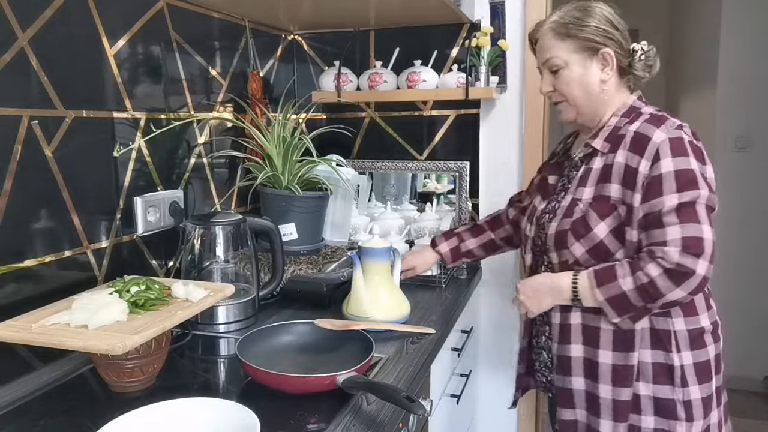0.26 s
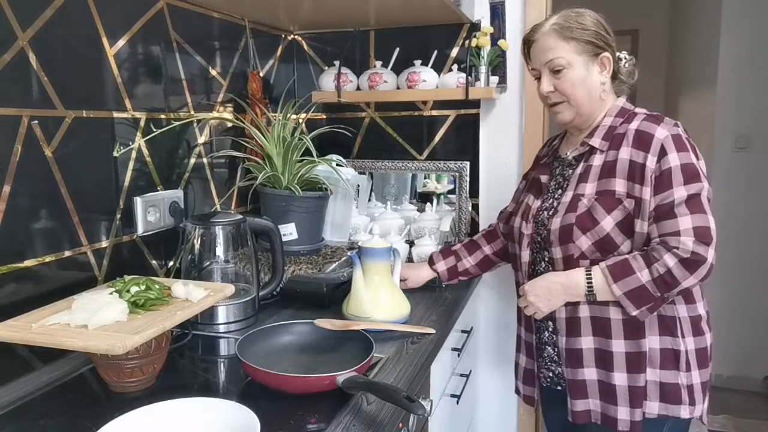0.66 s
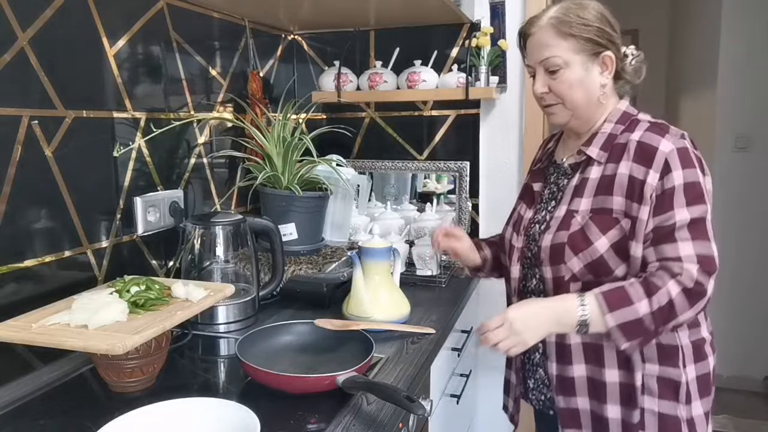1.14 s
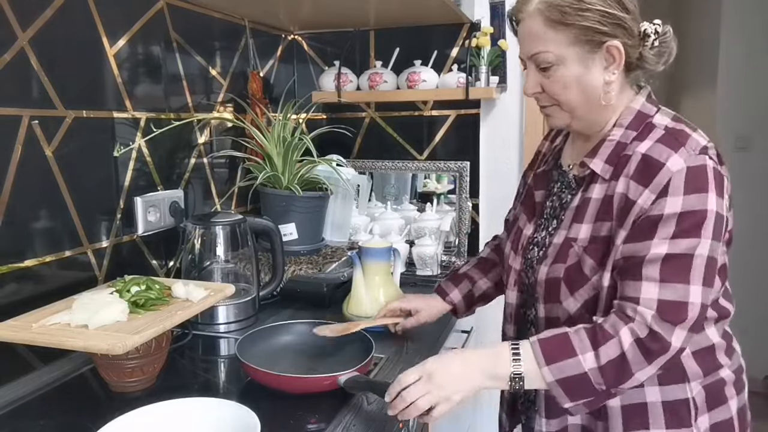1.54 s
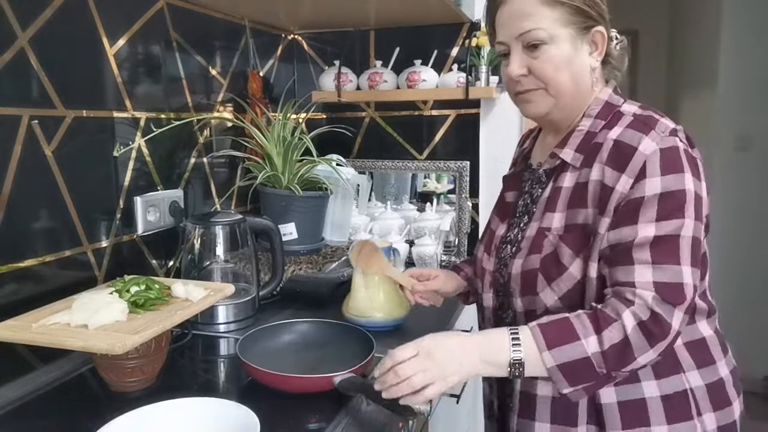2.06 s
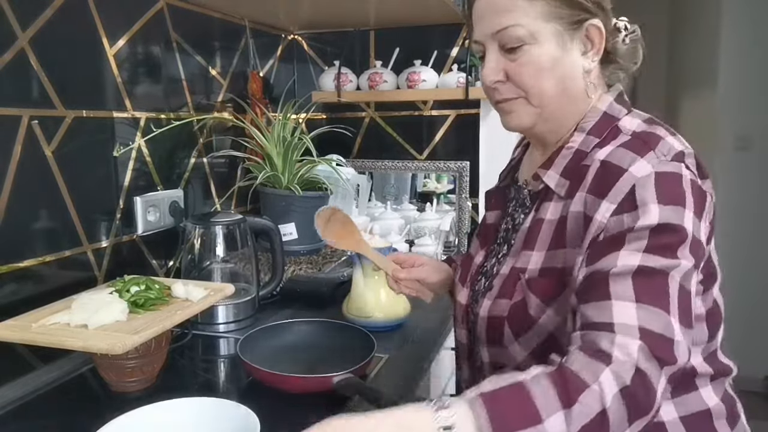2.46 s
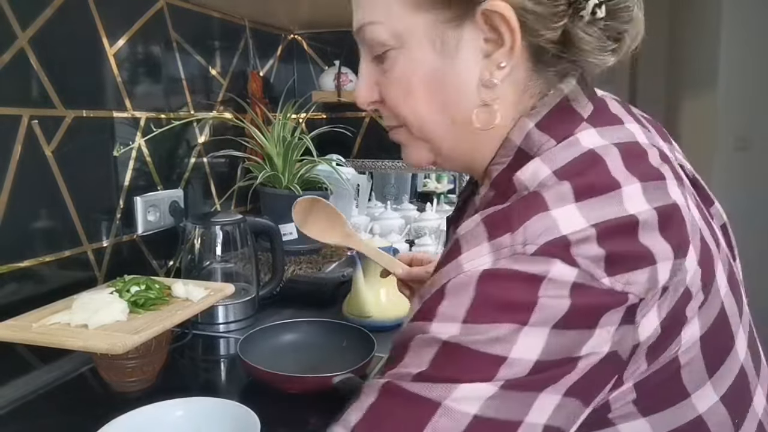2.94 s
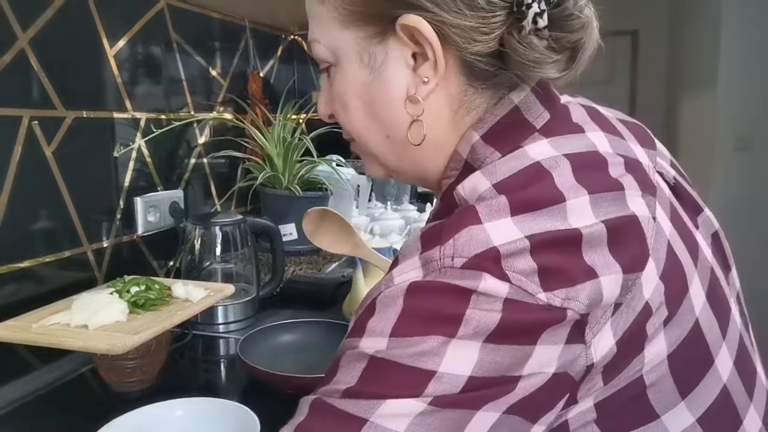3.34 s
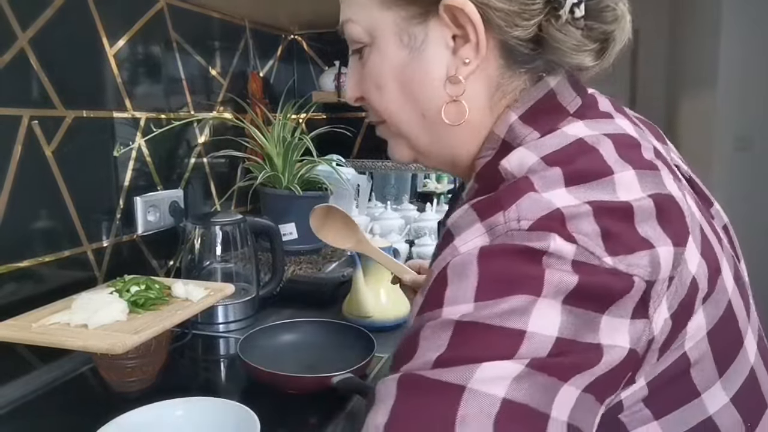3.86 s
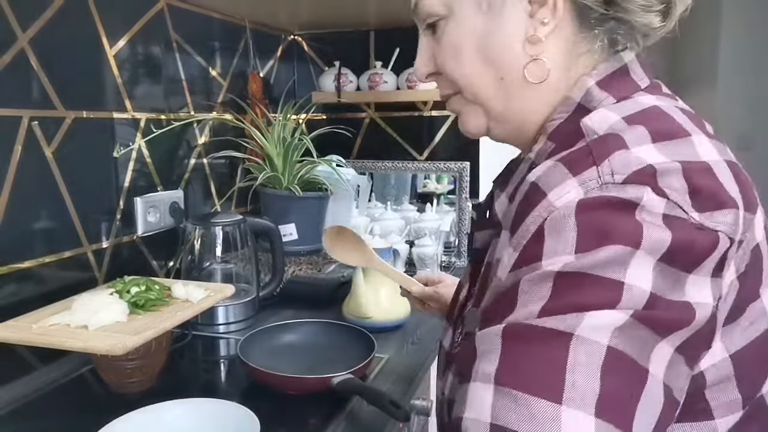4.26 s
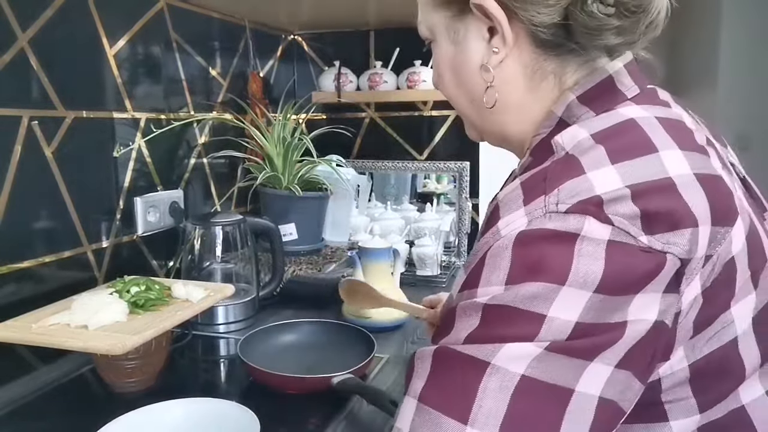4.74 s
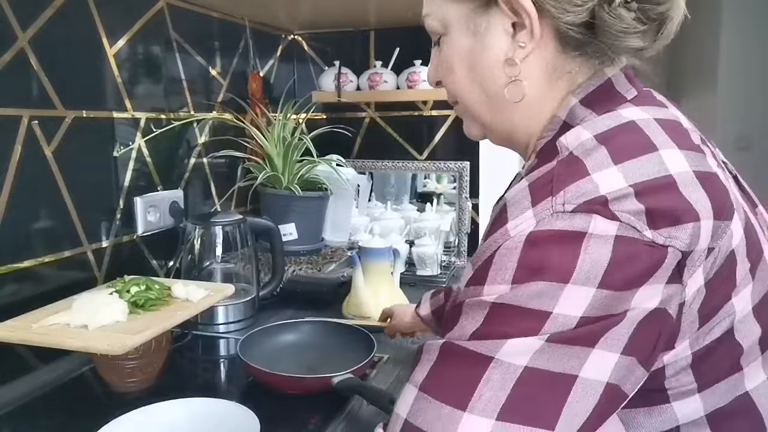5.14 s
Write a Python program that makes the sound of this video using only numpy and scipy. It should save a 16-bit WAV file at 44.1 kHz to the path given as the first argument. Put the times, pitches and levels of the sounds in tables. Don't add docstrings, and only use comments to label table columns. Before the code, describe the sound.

In a still, tiled kitchen, small knocks and soft steps lead to a short pan scrape and a sudden heavy bang with rattling grate.

```python
import sys
import numpy as np
from scipy import signal
from scipy.fft import rfft, irfft, next_fast_len
from scipy.io import wavfile
from scipy.ndimage import map_coordinates

SR = 44100
rng = np.random.default_rng(int(sys.argv[2]) if len(sys.argv) > 2 else 0)


def boost(x):
    u = np.asarray(x, float) / 20
    return 10 ** u


def output_pcm(signal):
    pcm = np.clip(np.atleast_2d(signal).T, -1, 1) * 32767
    wavfile.write(sys.argv[1], SR, np.round(pcm).astype(np.int16))


N = 237478


def unit(x):
    return x / np.sqrt(np.mean(x ** 2) + 1e-20)


def along(points, hz):
    f, value = np.transpose(points)
    return np.interp(np.log(hz + 1), np.log(f + 1), value)


def shape(points):
    return lambda hz: boost(along(points, hz))


def sides(db):
    return boost(np.array([db / 2, -db / 2]))


def wobble(rate, size=N):
    knots = rng.standard_normal(int(size * rate / SR) + 4)
    return map_coordinates(knots, [np.arange(size) * rate / SR])


def filtered(x, response):
    m = next_fast_len(x.shape[-1] + 8192, real=True)
    return irfft(rfft(x, m) * response(np.fft.rfftfreq(m, 1 / SR)), m)[..., :x.shape[-1]]


def resonances(peaks, widen):
    def response(f):
        total = 0
        for k, (centre, width, db) in enumerate(peaks):
            damping = 1j * f * width * widen
            total = total + (-1) ** k * boost(db) * damping / (centre * centre - f * f + damping)
        return total
    return response


def rush(gain, alike, size=N):
    turn = lambda hz: np.arccos(np.clip(along(alike, hz), -1, 1)) / 2
    split = lambda hz: gain(hz) * np.array([np.cos(turn(hz)), np.sin(turn(hz))])
    mid, side = filtered(rng.standard_normal((2, size)), split)
    return unit(np.array([mid + side, mid - side]))


def add(track, s, sound):
    part = track[:, round(s * SR):][:, :sound.shape[1]]
    part += sound[:, :part.shape[1]]


def level(rows):
    s, db = np.transpose(rows)
    t = np.arange(N) / SR
    return np.interp(t, s, db, -140, -140), np.clip(t - s[0], 0, s[-1] - s[0])


def swells(s, db, rise, fade):
    rounding = 0.1289
    coarse = np.arange(0, N / SR + .002, .002)
    t = coarse - s[:, None]
    away = np.hypot(np.maximum(-t / rise[:, None], t / fade[:, None]), rounding) - rounding
    power = boost(2 * (db[:, None] - 20 * away)).sum(axis=0)
    return np.interp(np.arange(N) / SR, coarse, 10 * np.log10(power + 1e-14))


# f/Hz, likeness [1 = same]
NEAR_LIKENESS = [(60, 0.9418), (300, 0.8526), (700, 0.7493), (2000, 0.095), (10000, 0.023)]


def burst(body, t60, size, rise=0.0005426):
    t = np.arange(size) / SR
    return (1 - np.exp(-(t / rise) ** 2)) * boost(-60 * t / t60) * rush(body, NEAR_LIKENESS, size=size)


def strike(body, t60, rise=0.0002456):
    ring = filtered(burst(np.ones_like, t60, size=12000, rise=rise), body)
    return ring / np.abs(ring).max()


# f/Hz, level/dB per Hz
FINE_GRIT = [(3500, -120), (4300, -1), (6000, -0.5), (9000, -2), (13000, -7.5), (14800, -20),
             (15900, -31.5)]


def friction(level_db, bright_db, pan_db, body, grain_db, grit=FINE_GRIT):
    out, touching = np.zeros((2, N)), np.flatnonzero(level_db > -139)
    span = slice(touching[0], touching[-1] + 1)
    size = span.stop - span.start
    grip = unit(boost(grain_db * wobble(90, size=size) + grain_db * wobble(400, size=size)))
    rub = rush(body, NEAR_LIKENESS, size=size)
    rub = rub + boost(bright_db[span]) * rush(shape(grit), NEAR_LIKENESS, size=size)
    out[:, span] = sides(pan_db[span]) * grip * boost(level_db[span]) * rub
    return out


def sing(hz, size, swing_db, rate, drift):
    phase = 2 * np.pi * hz * np.arange(size) / SR + drift * wobble(129.96, size=size)
    return boost(swing_db * wobble(rate, size=size)) * np.sin(phase)


# f/Hz, width/Hz, level/dB
FRIDGE_HUM = [(100.17, 7.447, 1.5), (192.54, 7.953, -2.5), (289.45, 33.71, -9), (356.54, 9.45, -3.5),
              (740.07, 3.705, -10)]
# f/Hz, level/dB per Hz
ROOM_RUMBLE = [(35, -14), (60, -3), (140, -10.5), (360, -14), (470, -14), (930, -20.5), (4000, -33.5),
               (5200, -66.5)]
# f/Hz, level/dB per Hz
FLOOR_DRONE = [(45, -11), (70, 5), (110, 9), (150, -5.5), (230, 4), (380, -5.5), (600, -37.5)]
# t/s of the peak, level/dB, rise by 20 dB/s, fade by 20 dB/s
SHAKES = [
    (1.92, -52, 0.3562, 0.8356),
    (3.74, -41.5, 0.2096, 0.22),
    (5.08, -35, 0.0471, 0.272),
    (5.25, -47, 0.1924, -0.0129),
    (5.38, -39.5, 0.0487, 1),
]
# f/Hz, level/dB per Hz
MIC_HISS = [(2060, -37.5), (3500, -14), (3820, -2), (4650, -7.5), (7360, -8), (8040, -11), (15000, -5),
            (15800, -9)]
# f/Hz, likeness [1 = same]
ROOM_LIKENESS = [(60, 0.094), (150, 0.415), (380, 0.7136), (950, -0.3171), (2380, 0.0427), (5980, -0.2392),
                 (15000, 0.0244)]
# f/Hz, likeness [1 = same]
ECHO_LIKENESS = [(60, 0.9391), (250, 0.9505), (700, 0.041), (2000, .05)]


def room_tone():
    mains = np.sin(2 * np.pi * 50.102 * np.arange(N) / SR + .5 * wobble(11))
    mains = boost(-55.0 + 2.2 * wobble(13.0)) * mains
    hum = boost(-65.5) * rush(resonances(FRIDGE_HUM, widen=0.5885), ROOM_LIKENESS)
    rumble = boost(-66.5 + 0.7693 * wobble(3.3949)) * rush(shape(ROOM_RUMBLE), ROOM_LIKENESS)
    stirred = boost(-66) + boost(swells(*np.transpose(SHAKES)))
    drone = stirred * boost(4.2334 * wobble(21.874) - 4.0) * rush(shape(FLOOR_DRONE), ECHO_LIKENESS)
    hiss = boost(-78.0) * rush(shape(MIC_HISS), ROOM_LIKENESS)
    return rumble + drone + hum + mains + hiss


# t/s, level/dB at the peak, f/Hz,
# t60/s
TAPS = [(0.424, -57, 2497, 0.1214), (0.428, -64, 1888, 0.1023), (0.424, -59, 1432, 0.0487),
        (0.979, -58.5, 5417, 0.098), (0.799, -61, 2100, 0.2155), (0.829, -59.5, 891.4, 0.1839),
        (0.868, -58.5, 1893, 0.0919), (0.978, -37, 1994, 0.0463), (0.985, -38, 2022, 0.0752),
        (1.001, -45.5, 1816, 0.0806), (1.171, -41.5, 1605, 0.02533), (1.174, -50, 752.7, 0.0429),
        (1.478, -64, 1030, 0.1466), (1.763, -43.5, 611.9, 0.1331), (1.793, -46, 600.6, 0.05565),
        (1.948, -51, 703.7, 0.139), (1.949, -54, 1501, 0.0866), (1.95, -58, 2403, 0.0842),
        (2.009, -46, 743.3, 0.05097), (2.318, -54.5, 2690, 0.122), (2.648, -59, 2045, 0.0698),
        (2.964, -66, 2600, 0.078), (4.809, -60.5, 890, 0.2909), (2.83, -63.5, 892.3, 0.1355),
        (4.84, -60.5, 1837, 0.1342)]


def taps():
    out = np.zeros((2, N))
    for s, db, hz, t60 in TAPS:
        mode = resonances([(hz, 316.1, 0)], widen=0.8262)
        add(out, s, boost(db) * strike(lambda f: mode(f) ** 2 + 0.2938 * mode(f), t60))
    return out


# t/s of the peak, rub level/dB, fade by 20 dB/s, brightness/dB, shuffle/dB
SCUFFS = [(0.48, -72, 0.12, -11, -0.5), (0.83, -70, 0.3, -5.5, -0.5), (0.93, -76, 0.7, -6, -1),
          (1.1, -57.5, 0.11, -10, 1.5), (1.177, -58, 0.0863, -14, 8.5), (1.255, -65.5, 0.14, -1, -10),
          (1.483, -68, 0.03, 0, -9.5), (1.51, -68, 0.12, -1, -9.5), (1.66, -70, .12, -2, -5),
          (1.73, -61, 0.035, 2.5, -2.5), (1.76, -60, .09, 1, -3), (1.797, -58, 0.14, -3.5, -1.5),
          (1.96, -66.5, 0.01, -26, 11.5), (2.012, -57.5, 0.1, -4.5, -1), (2.07, -65, .1, -5, 4),
          (2.13, -61, 0.13, -8, -12), (2.322, -60.5, 0.11, -5.5, -13), (2.59, -72, 0.1, 0, -8),
          (2.645, -70, 0.13, -4, -5), (2.83, -71, 0.2, -5, 3), (2.99, -71.5, 0.23, -9, -7),
          (3.11, -77, .1, 1, -13), (3.174, -73, 0.54, -4, -18), (3.54, -67, .2, -14, 6),
          (4.82, -70, 0.09, -9, -6), (4.885, -71, 0.13, -12, -8)]
# f/Hz, level/dB per Hz
CLOTH_RUB = [(900, -37.5), (1400, -2.5), (2200, -1.5), (3500, -5), (5000, -10), (6500, -42.5)]
# f/Hz, level/dB per Hz
LOW_SHUFFLE = [(200, -7.5), (400, 0.5), (800, -4), (1300, -4), (1900, -37)]


def scuffs():
    s, db, fade, bright_db, low_db = np.transpose(SCUFFS)
    rise = 0.61945 * fade
    rub, grit, shuffle = (swells(s, db + more, rise, fade) for more in (0, bright_db, low_db))
    low = boost(shuffle + 0.803 * wobble(64)) * rush(shape(LOW_SHUFFLE), NEAR_LIKENESS)
    pan_db = 1.5 * wobble(5.707)
    return low + friction(rub, grit - rub, pan_db, shape(CLOTH_RUB), grain_db=0.8213)


# t/s, level/dB at the peak, brightness/dB, left-right/dB
CLACKS = [(0.978, -35.5, -28, 4.5), (0.986, -33, -26.5, 1), (1.001, -37.5, -13, 4),
          (1.0205, -23, -18.5, 3.5), (1.028, -23.5, -19, -0.5), (1.041, -30, -14.5, -1),
          (1.056, -26, -13, -5), (1.065, -28, -22.5, 7), (1.078, -28, -29.5, 5.5), (1.097, -37, -19, -3.5),
          (1.113, -41, -27.5, 2), (1.124, -47, -30, 5.5), (1.14, -44, -29, 0), (1.166, -37.5, -19, 2.5),
          (1.175, -50, -25, 2.5), (1.19, -57, -24.5, -1.5)]
# f/Hz, width/Hz, level/dB
LID = [(638.04, 46.71, -5.5), (942.7, 45.25, -1.5), (1345.6, 26.73, 1), (1782.5, 56.06, 4),
       (2100, 45.92, 3.5), (2460, 16.02, -25), (2644.8, 86.6, -10), (4066.2, 230.4, -17)]
# f/Hz, level/dB per Hz
LID_BODY = [(120, -48.5), (272, -12.5), (427, -2), (683, -28.5), (1850, -13), (2420, -25), (10100, -5),
            (15000, -35.5)]


def clacks():
    out, ring = np.zeros((2, N)), resonances(LID, widen=6.583)
    body = lambda f: ring(f) + 0.0512 * shape(LID_BODY)(f)
    for s, db, bright_db, pan_db in CLACKS:
        knock = strike(body, t60=0.03406, rise=0.0003384)
        hiss = boost(bright_db - 7) * burst(shape(FINE_GRIT), t60=0.08985, size=12000)
        add(out, s, boost(db - 0.5) * sides(pan_db)[:, None] * (knock + hiss))
    return out


# t/s,
# level/dB at the peak, f/Hz, t60/s, rise/s
THUMPS = [(1.058, -52.5, 287, 0.2202, 0.01598), (1.12, -51, 101.2, 0.6364, 0.02234),
          (1.162, -50, 300, 0.1435, 0.00967), (1.3, -41.5, 56.52, 0.2777, 0.00795),
          (1.247, -55.5, 65.84, 0.335, 0.019), (1.349, -53, 62.4, 0.1, 0.015),
          (1.639, -60, 267, 0.1285, 0.01198), (1.694, -47, 103.74, 0.1762, 0.01145),
          (1.76, -49, 170.01, 0.1078, 0.0077), (1.782, -42, 253.37, 0.1054, 0.01161),
          (1.961, -46.5, 217, 0.1114, 0.0093), (2.029, -37, 95.65, 0.1265, 0.00798),
          (2.06, -44, 101.7, 0.1965, 0.0467), (2.469, -55, 197, 0.1548, 0.0144),
          (3.524, -51, 110.9, 0.1447, 0.01696), (3.637, -27, 98, 0.10424, 0.01473),
          (3.66, -36, 91, 0.0882, 0.00986), (3.68, -42.5, 99.76, 0.1614, 0.01067),
          (3.775, -37, 106.2, 0.2268, 0.0094), (3.85, -44, 120.72, 0.2029, 0.02447),
          (5.3, -33, 270, 0.2029, 0.01973), (5.285, -30, 119, 0.494, 0.0437),
          (5.225, -39.5, 225, 0.4495, 0.03196), (5.135, -26.5, 112.61, 0.1774, 0.00975),
          (5.019, -19.5, 92, 0.2598, .004), (5.02, -22, 68, .55, .006), (5.018, -20, 121, .16, 0.003804),
          (5.085, -23.5, 119, 0.3179, 0.0165), (5.098, -26, 272, 0.08017, 0.00901),
          (5.345, -28, 93, .3, .006), (5.2, -34, 118, 0.371, .02), (5.348, -20, 263.66, 0.0921, 0.004515),
          (1.22, -53.5, 186.53, 0.136, 0.0172), (2.05, -52, 220, 0.2096, 0.0186),
          (3.8, -47, 61.08, 0.2784, 0.024), (3.05, -61, 106.4, 0.8146, 0.055),
          (1.66, -55, 183, 0.2013, 0.02024)]


def thumps():
    out, t = np.zeros((2, N)), np.arange(SR // 3) / SR
    for s, db, hz, t60, rise in THUMPS:
        swell = (1 - np.exp(-t / rise)) * boost(-60 * t / t60)
        mode = resonances([(hz, 0.2747 * hz, 0)], widen=1.0)
        smear = rush(lambda f: mode(f) ** 2, NEAR_LIKENESS, size=len(t))
        thump = swell / swell.max() * (np.sin(2 * np.pi * hz * t) + 0.4559 * smear)
        add(out, s, boost(db) * sides(1.5)[:, None] * thump)
    return out


# t/s, level/dB
SLIDE = [
    (3.228, -91),
    (3.258, -60.5),
    (3.298, -53),
    (3.356, -61.5),
    (3.42, -59.5),
    (3.461, -66),
    (3.5, -78),
]
# f/Hz, level/dB rms, change/dB per s
STEEL = [(2234, -82, 20), (2936, -76, 40), (3708, -66, 0), (4094, -73, -30), (4568, -69, -10),
         (5498, -62, -90), (7106, -74, 0), (7568, -66, -60), (8238, -68, -90), (8716, -76, 20),
         (9466, -70, -100), (9915, -72, -70), (11205, -73, -30), (12550, -75, -30)]
# f/Hz, level/dB per Hz
SHIMMER = [(3450, -39.5), (3750, 0.5), (4700, 5.5), (5000, -9.5), (6500, 2), (8500, -4.5), (12500, -3.5),
           (15700, -10)]


def slide():
    out, start, size = np.zeros((2, N)), round(SLIDE[0][0] * SR), SR // 2
    level_db, since = (curve[start:start + size] for curve in level(SLIDE))
    pan_db = 14 - 25.5 * since
    modes = np.zeros(size)
    for hz, db, tires_db in STEEL:
        tone = sing(hz, size, swing_db=4.0, rate=43.715, drift=0.5216)
        modes += boost(db + tires_db * np.maximum(since - .08, 0)) * tone
    spacing_hz = 70
    packed_db = 4.5 * rng.standard_normal(SR // spacing_hz)
    uneven = lambda hz: boost(np.interp(hz / spacing_hz, np.arange(len(packed_db)), packed_db))
    shimmer = rush(lambda hz: shape(SHIMMER)(hz) * uneven(hz), NEAR_LIKENESS, size=size)
    shimmer = boost(-6 + 2.253 * wobble(120.27, size=size)) * shimmer
    add(out, SLIDE[0][0], boost(level_db) * sides(pan_db) * (boost(58.5) * modes + shimmer))
    return out


DRAG_PAN_DB = 5.5
# t/s, rub level/dB
DRAG = [
    (3.47, -76),
    (3.572, -63.5),
    (3.608, -49.5),
    (3.616, -36),
    (3.69, -40.5),
    (3.792, -44),
    (3.876, -70.5),
    (4.006, -77),
    (4.05, -81),
]
# f/Hz, width/Hz, level/dB
PAN = [(789.1, 128.98, 6.5), (1539.7, 138.16, 0.5), (1953.7, 391.5, -10), (3120.6, 63.74, -4),
       (3504.9, 36.53, -9.5), (4230.2, 34.15, -15), (5234, 100, -19.5), (6660, 140, -14)]
# t/s, level/dB at the peak, left-right/dB
CATCHES = [(3.613, -46, -12), (3.631, -27, -1), (3.662, -40, -5), (3.679, -39, 6), (3.775, -29, 8),
           (3.781, -25, 0.5), (3.786, -21.5, 6.5), (3.801, -28.5, 4.5), (3.819, -28, 7), (3.838, -31.5, 2),
           (3.855, -39, -4.5), (3.873, -50, 0)]
# f/Hz, width/Hz, level/dB
CATCH = [(659.37, 62.72, -4), (771.04, 84.19, 4.5), (917.9, 91.29, -2), (1556.3, 152.5, -8.5),
         (2217.9, 86.2, -12), (2600, 57.3, -27.5), (3032.6, 95, -12), (4076.3, 69.9, -21)]


def drag():
    level_db = level(DRAG)[0]
    lighter_db = np.clip(-50.5 - level_db, 0, 40)
    bright_db, low_db = -5 - 0.1421 * lighter_db, -2.5 + 0.2248 * lighter_db
    ring = resonances(PAN, widen=1.175)
    colour = shape([(700, -17.5), (1000, -9.5), (4500, 1.0), (6000, -53.5)])
    body = lambda f: (ring(f) + 0.181) * colour(f)
    out = friction(level_db, bright_db, np.full(N, DRAG_PAN_DB), body, grain_db=2.5)
    rumble = shape([(150, 1.0), (260, 6), (800, 0.0), (1100, -25.5)])
    out += boost(level_db + low_db) * rush(rumble, NEAR_LIKENESS)
    for s, db, side_db in CATCHES:
        knock = strike(resonances(CATCH, widen=1.5986), t60=0.024544)
        add(out, s, boost(db + 1.5) * sides(side_db)[:, None] * knock)
    return out


# t/s of the peak, f/Hz, level/dB, rise by 20 dB/s, fade by 20 dB/s
WAKES = [(3.635, 2100, -42, .03, .05), (3.632, 4350, -51, .025, .03), (3.62, 3400, -50, .02, .03),
         (3.7, 4300, -48, .035, .09), (3.7, 2050, -51, .03, .04), (3.735, 3500, -47, .05, .04),
         (3.765, 1620, -44.5, .07, .06), (3.72, 5300, -54, .08, .1), (3.79, 3050, -46.5, .04, .08),
         (3.795, 4100, -50, .03, .09), (3.825, 1450, -48, .03, .07)]


def wakes():
    out, size = np.zeros((2, N)), SR // 2
    t = np.arange(size) / SR - .2
    for s, hz, db, rise, fade in WAKES:
        swell = boost(db - 20 * (np.hypot(np.maximum(-t / rise, t / fade), .3) - 0.2395))
        tone = sing(hz, size, swing_db=3.5, rate=150, drift=1.2)
        add(out, s - .2, sides(DRAG_PAN_DB)[:, None] * swell * tone)
    return out


# f/Hz, width/Hz, level/dB
GRATE = [(1922.3, 44, -6), (2626.8, 108.3, 0.5), (3382, 43.7, -12), (3683, 150.4, -0.5),
         (4324.9, 68.54, -9), (6654, 84, -14), (7505, 29.55, -4.5), (9872, 129.5, -13), (12573, 274.7, -16)]
# t/s, level/dB at the peak, crack/dB, left-right/dB, weight on the deep tones/dB
BLOWS = [(5.016, -5.5, -44.5, 3.5, -22), (5.0231, -6.5, -22.5, 2, 2.5), (5.029, -12.5, -27, -3.5, -6.5),
         (5.050, -18.5, -5, 0.5, -29), (5.069, -20.5, -16, 3, 3.5), (5.081, -19, -0.5, 1, -4),
         (5.101, -15.5, -6, 2, -12.5), (5.117, -23.5, 0.5, -1, -8.5), (5.146, -23, -18, 1, -1.5),
         (5.339, -19, -49, 5, 0), (5.347, -14, -41, 2, 2)]
# f/Hz, level/dB, t60/s
HOB = [(69.5, -2.5, 0.2812), (93, -0.5, 0.2012), (118.71, 0.5, 0.2208), (142.3, -7.5, 0.1419),
       (174.72, -9, 0.2126), (224.5, -8, 0.2454), (266.69, -1.5, 0.15976), (344.97, -4.5, 0.1519),
       (375.56, -12, 0.1204), (405.4, -25.5, 0.0837), (515.07, -12, 0.12534), (658.73, -7, 0.078),
       (705.96, -8.5, 0.06596)]
# f/Hz, level/dB per Hz
THUD = [(35, -36), (60, 1), (250, -3), (554, -10.5), (755, -11.5), (950, -28), (1800, -34), (3300, -120)]
# t/s, level/dB at the peak
KNOCKS = [
    (5.017, -25),
    (5.3397, -35),
    (5.352, -36),
    (5.3593, -39),
]
# f/Hz, width/Hz, level/dB
HANDLE = [(1256.8, 57.04, 6), (1495.9, 61.62, 3.5), (2530, 100.28, -4), (2876.7, 59.23, 1),
          (3643.2, 31.77, -8), (6715.4, 55.2, -22)]


def landing():
    out, t = np.zeros((2, N)), np.arange(SR // 2) / SR
    grate = resonances(GRATE, widen=1.371)
    for s, db, crack_db, pan_db, weight_db in BLOWS:
        boom = np.zeros(len(t))
        for hz, mode_db, t60 in HOB:
            first_db = mode_db + weight_db * (hz < 200) + rng.normal(0, 1.0)
            boom += boost(first_db - 60 * t / t60) * np.sin(2 * np.pi * hz * rng.normal(1, 0.004583) * t)
        thud = burst(shape(THUD), t60=0.15152, size=len(t), rise=0.000491)
        blow = -.27 * boom * (1 - np.exp(-t / 0.0001108)) + 0.31977 * thud
        crack = burst(lambda f: grate(f) + 0.2224 * (f > 900), t60=0.03935, size=5000)
        blow[:, :5000] += boost(crack_db - 4.5) * crack
        add(out, s + .002, boost(db) * sides(pan_db)[:, None] * blow)
    for s, db in KNOCKS:
        add(out, s, boost(db + 2.0) * strike(resonances(HANDLE, widen=5.292), t60=0.08097))
    return out


# t/s, level/dB
RATTLE = [
    (5.022, -60),
    (5.026, -30),
    (5.06, -32.5),
    (5.075, -36.5),
    (5.09, -33),
    (5.12, -34.5),
    (5.218, -53.5),
    (5.264, -82),
    (5.3, -95),
]
# f/Hz, level/dB per Hz
JANGLE = [(3800, -58), (4500, -3), (5500, -1.5), (7600, 0), (9000, -2), (12500, -4.5), (15700, -12),
          (16000, -34.5)]


def rattling():
    grate = resonances(GRATE, widen=1.371)
    colour = shape([(700, -5.5), (1200, 0.0), (4400, -6.0), (5200, -31)])
    body = lambda f: (grate(f) + 0.3989) * colour(f)
    level_db, since = level(RATTLE)
    bright_db, pan_db = -2.5 - 42 * since, 5.5 - 30 * since
    return friction(level_db, bright_db, pan_db, body, grain_db=0.704, grit=JANGLE)


# f/Hz, t60/s
WALLS = [(60, 0.618), (300, 0.3879), (1000, 0.40855), (4000, 0.24435), (8000, 0.15445), (15000, 0.15783)]


def walls(x):
    hz, t, z = signal.stft(rush(np.ones_like, ECHO_LIKENESS, size=SR // 2), SR, nperseg=256)
    tail = signal.istft(z * boost(-60 * t / along(WALLS, hz)[:, None]), SR, nperseg=256)[1]
    late = np.pad(x.mean(axis=0), (300, 0))[None]
    return signal.fftconvolve(late, tail / np.linalg.norm(tail[0]), axes=1)[:, :N]


def from_left(x):
    lag_s = 20 / SR
    late = lambda hz: np.exp(-2j * np.pi * hz * lag_s * hz ** 2 / (hz ** 2 + 450 ** 2))
    return np.array([x[0], filtered(x[1], late)])


def scene():
    light, lid, pan, blows, rattle = taps(), clacks(), drag(), landing(), rattling()
    less_deep = filtered(blows, lambda hz: hz ** 2 / (hz ** 2 + 190.2 ** 2))
    echoes = boost(-2.5) * walls(lid + light) + boost(-4.5) * walls(pan)
    echoes = echoes + boost(-8.5) * walls(less_deep + 0.79 * rattle)
    left = from_left(pan + wakes() + blows + rattle + slide())
    return room_tone() + light + scuffs() + lid + thumps() + left + echoes


def band_limit(x):
    return signal.sosfilt(signal.butter(12, 15760, fs=SR, output="sos"), x)


def record(dry):
    corner_hz, top_hz = 50, 15900
    heard = filtered(dry, lambda hz: (1j * hz / (corner_hz + 1j * hz)) ** 3 * (hz < top_hz))
    return band_limit(heard)


dry = scene()
out = record(dry)
output_pcm(out)
```